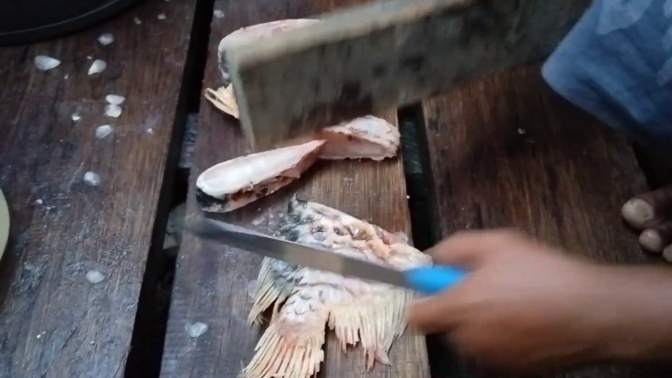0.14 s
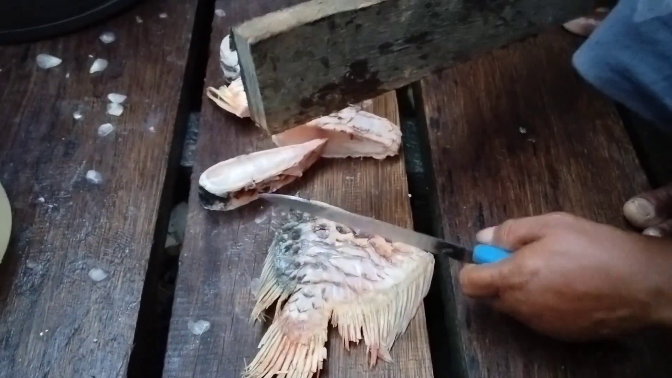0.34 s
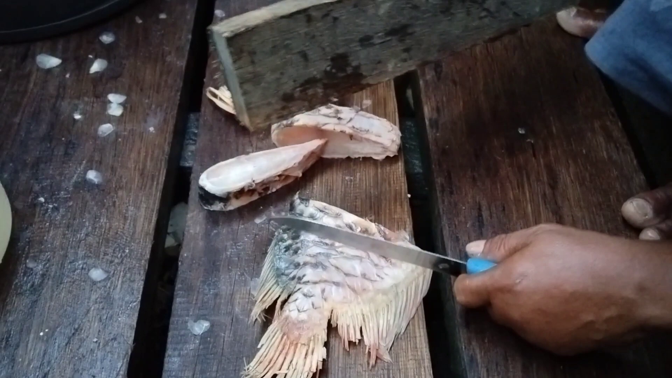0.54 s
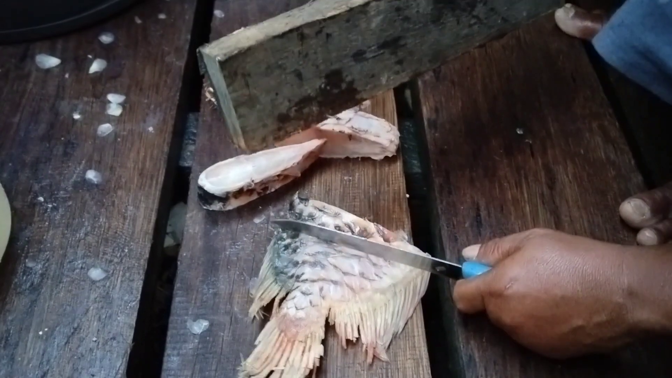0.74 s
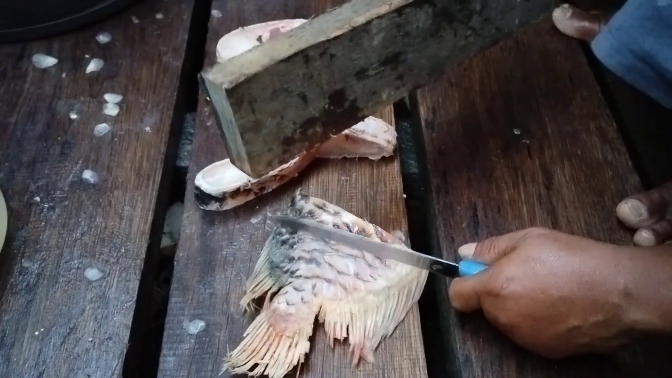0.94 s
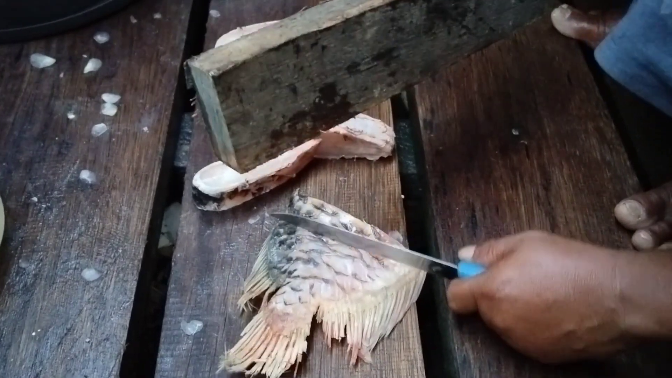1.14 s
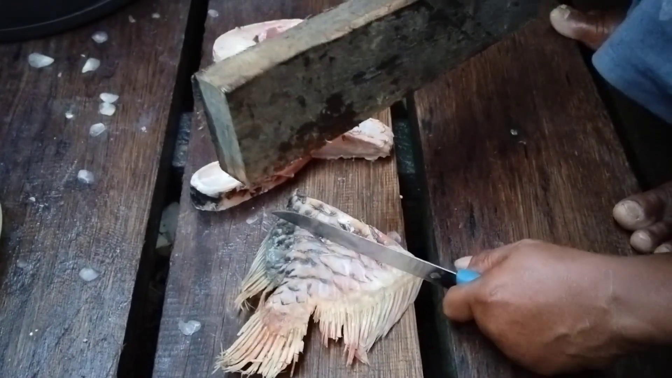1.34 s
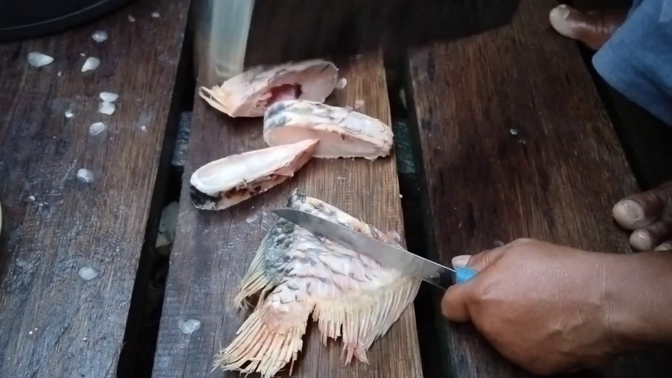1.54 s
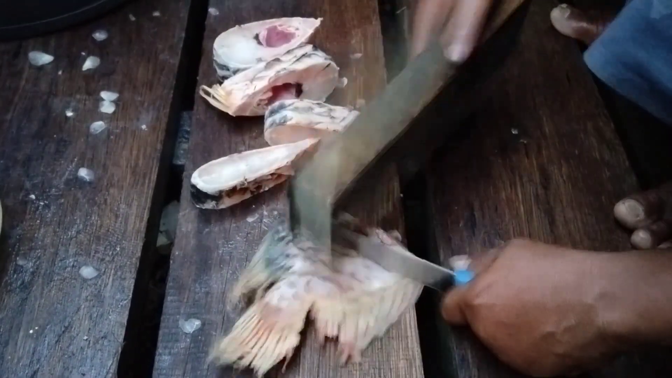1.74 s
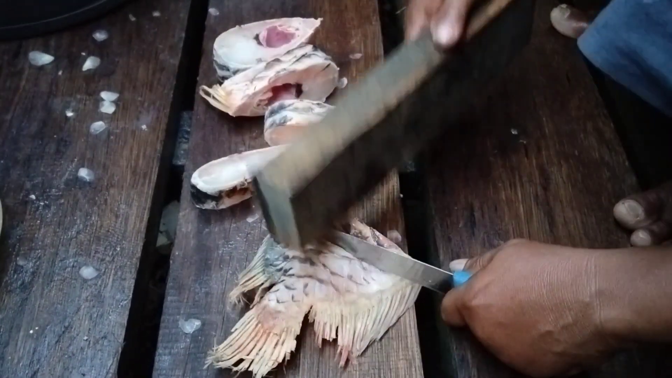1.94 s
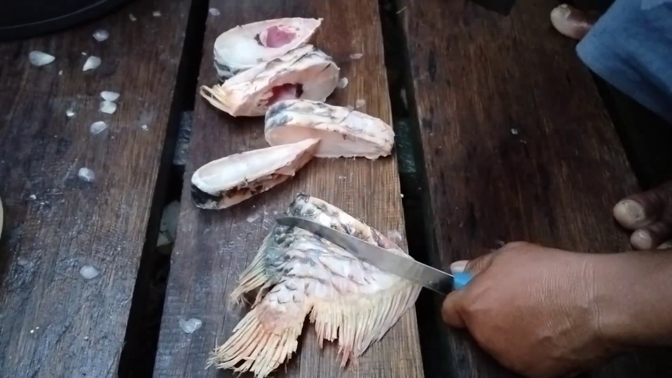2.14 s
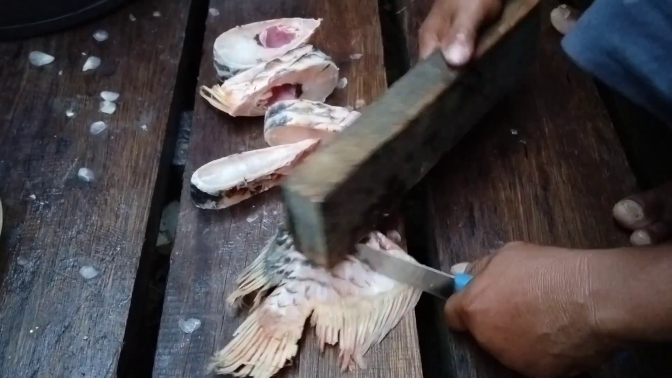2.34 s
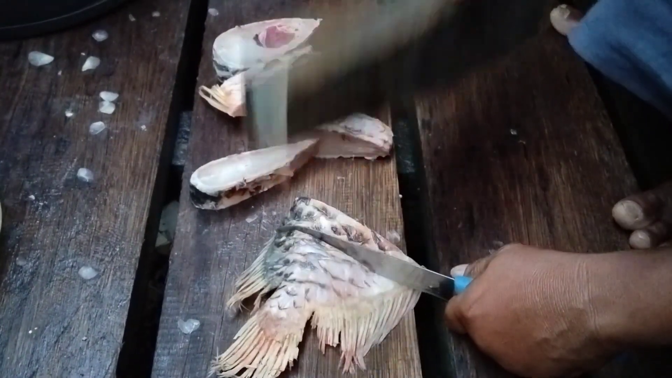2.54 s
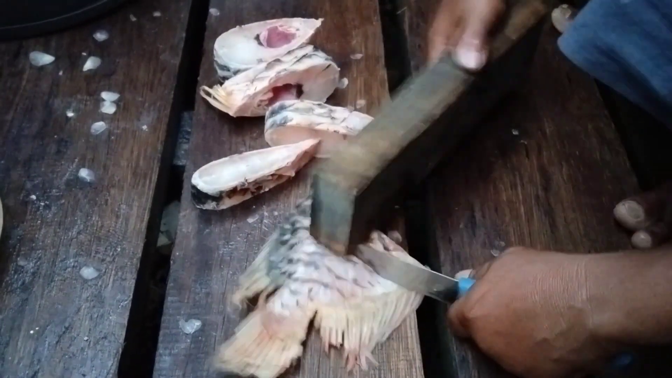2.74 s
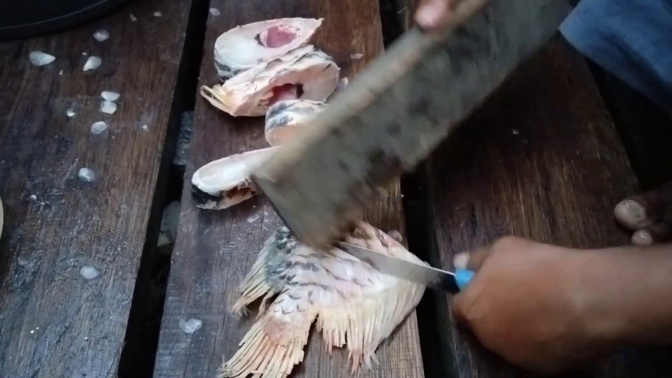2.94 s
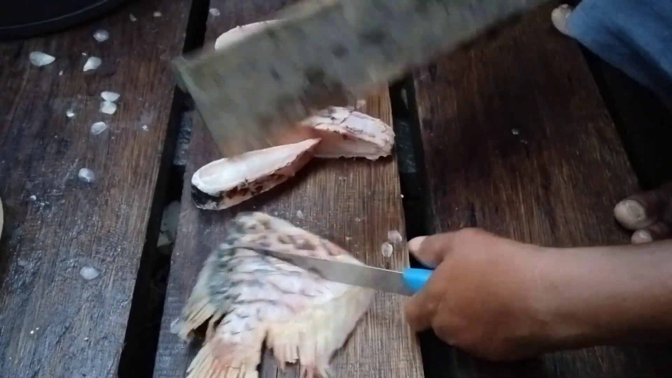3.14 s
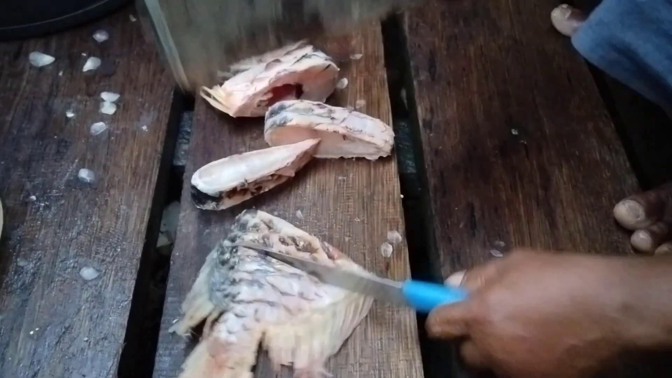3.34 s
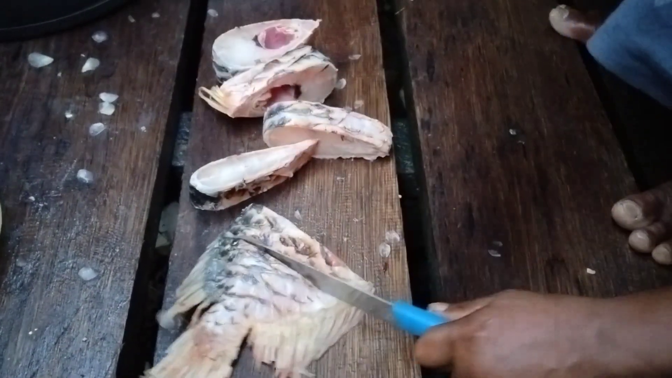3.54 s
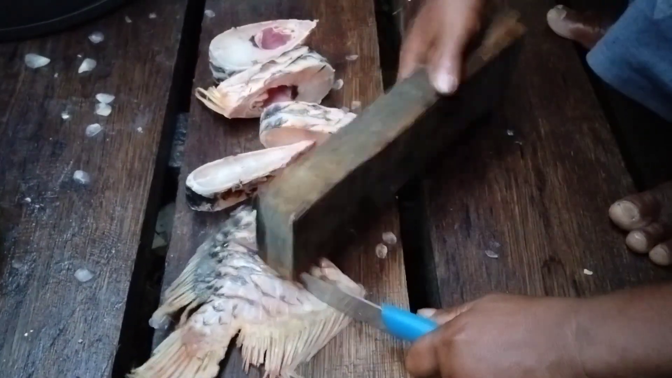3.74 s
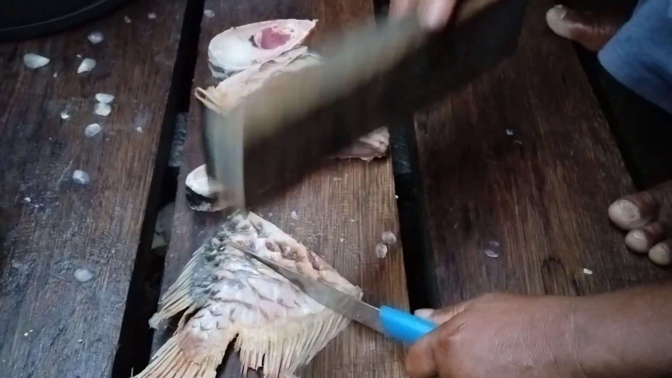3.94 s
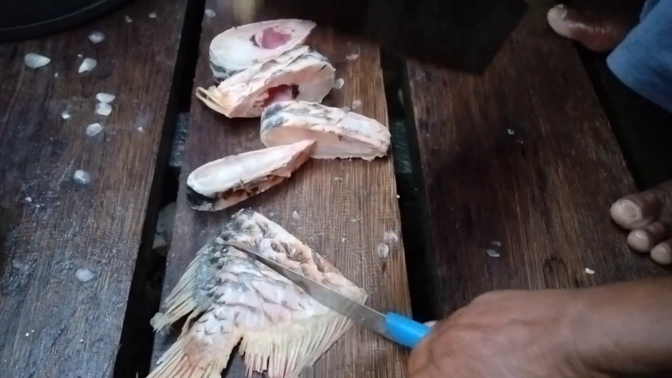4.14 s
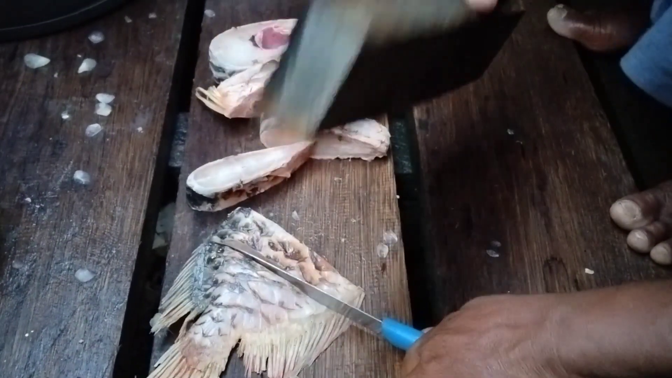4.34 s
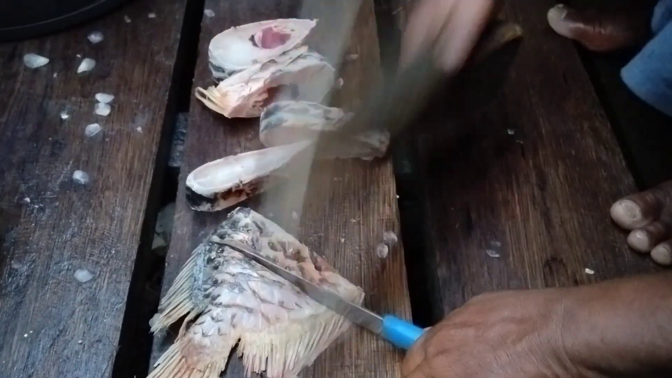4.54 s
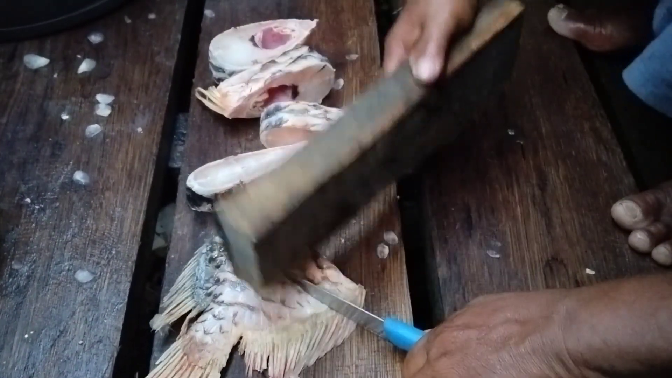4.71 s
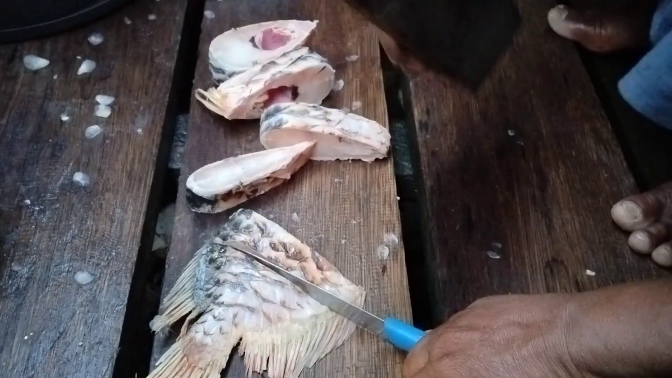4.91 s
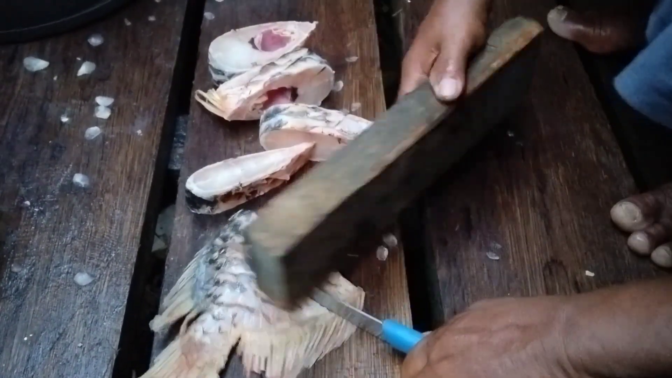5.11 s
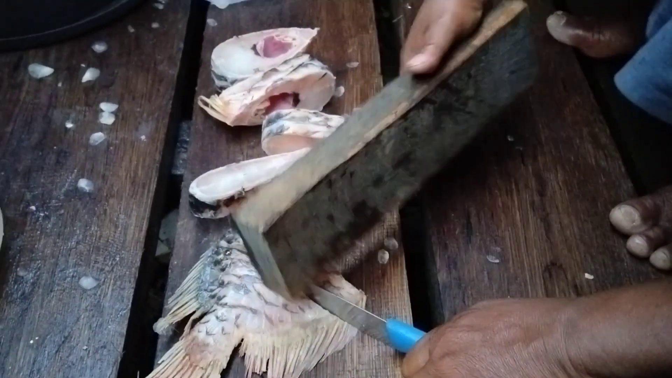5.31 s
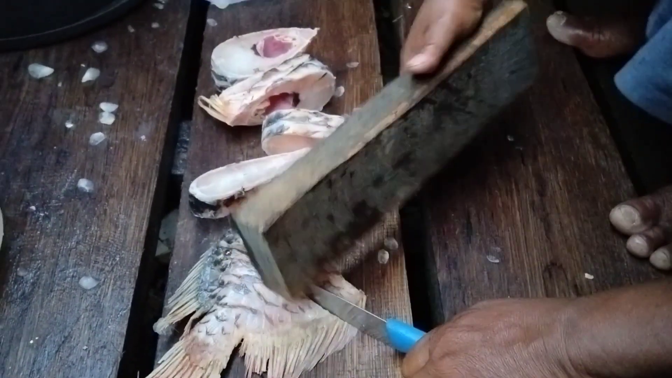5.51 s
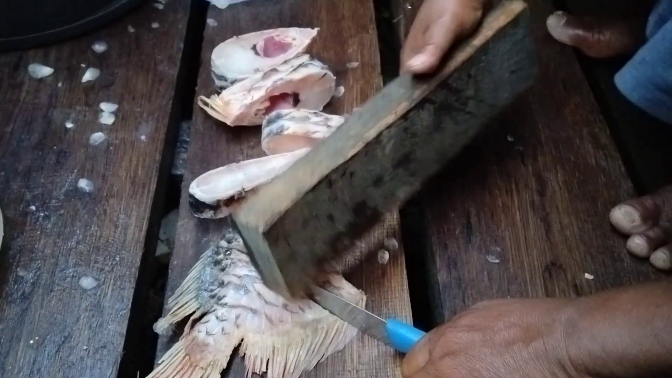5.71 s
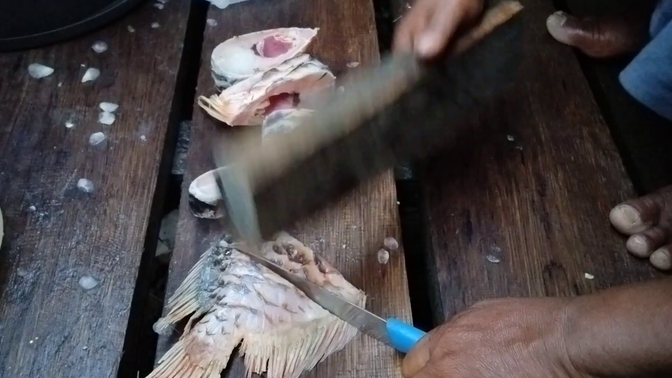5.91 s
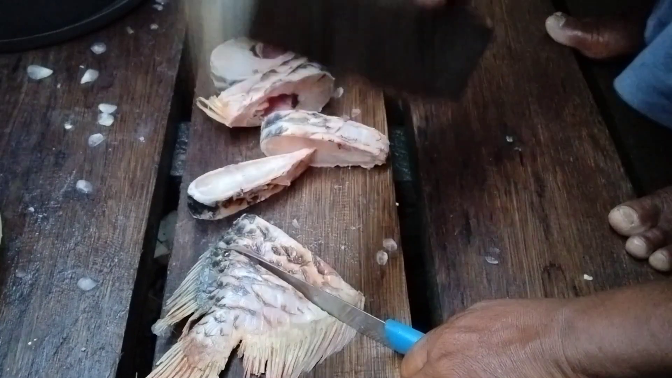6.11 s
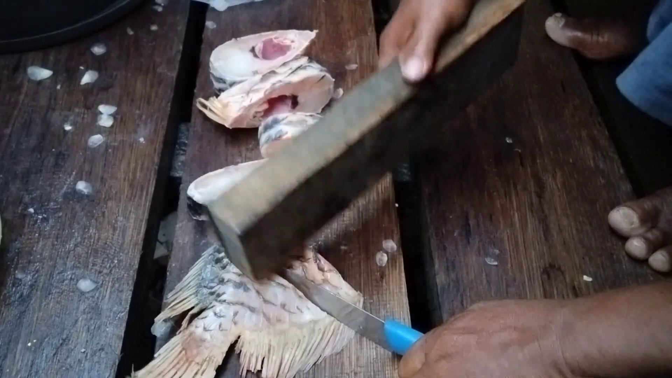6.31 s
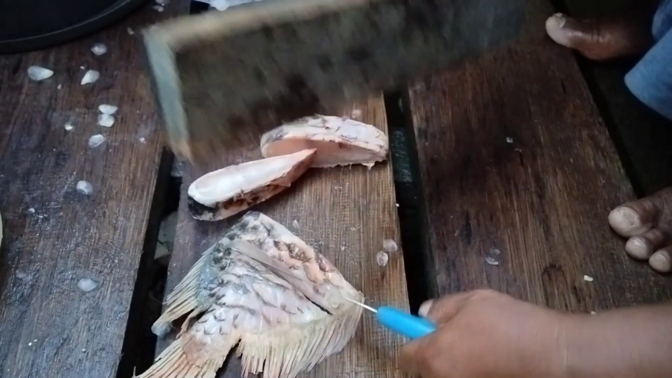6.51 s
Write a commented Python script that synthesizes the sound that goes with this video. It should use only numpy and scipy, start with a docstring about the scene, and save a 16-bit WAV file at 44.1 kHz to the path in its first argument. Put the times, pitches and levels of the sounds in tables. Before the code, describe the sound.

Chopping frozen fish on wooden planks, heard close on a phone. A soft background of motor hum, airy hiss, high insect and distant birds opens, with a few faint clacks. From 1.8 seconds come eight spaced hammer blows on a steel blade: the first four sharper and more piercing, the last four woodier and somewhat softer. Each has an instant attack, a fast-dying ring around two kilohertz and a short roomy tail, while the background ducks.

```python
"""Chopping frozen fish on a plank floor

Close to the microphone a wooden block hammers a knife spine: blade, planks and floor ring as decaying
modes, while the cracking fish and the room are bands of decaying noise; thuds and taps lie between.
Behind, a motor hums, a wavering sine amid noise bands; a high insect and a whistly, swelling hiss are
shaped noise, over quiet air; far birds peep in sines. After every blow all of this background but the
birds sinks, then partly returns."""
import sys
import numpy as np
from scipy import signal
from scipy.fft import rfft, irfft
from scipy.io import wavfile
from scipy.ndimage import uniform_filter1d

SR = 44100
rng = np.random.default_rng(int(sys.argv[2]) if len(sys.argv) > 2 else 0)


def wav_record(signal):
    """Record a signal, one row per channel, as 16-bit PCM in the file named by sys.argv[1]."""
    frames = np.transpose(np.atleast_2d(signal))
    bounded = np.clip(frames, -1, 1)
    # unit amplitude maps onto the largest positive 16-bit level
    quanta = np.round(bounded * 32767).astype(np.int16)
    wavfile.write(sys.argv[1], SR, quanta)


N = 293706

# Motor hum bands: (centre [Hz], width [Hz], level within the hum [dB])
HUM_BANDS = [(104, 4.4, -9), (125, 45, -3.5), (218.7, 3.9, -8.5), (339, 13, -14), (352, 76, -14)]
# Motor level before the sink: (time [s], level [dB])
MOTOR_LEVEL = [(0, -52.5), (.55, -52), (1.1, -55.5), (1.5, -49.5), (1.8, -48.5), (2.3, -49.5), (3.2, -56.5),
               (4.2, -56), (4.6, -54.5), (5.0, -49.5), (6.0, -60), (6.66, -57.5)]
# Hiss bands: (centre [Hz], width [Hz], resting level before the sink [dB])
HISS_BANDS = [(3020, 1000, -58), (4250, 1300, -63.5), (5420, 940, -60), (6780, 1300, -69)]
# Slow drift of the resting hiss: (time [s], change of level [dB])
HISS_DRIFT = [(0, -2), (1.3, -3), (1.8, 0.9), (3.3, 3.5), (4.3, 4.5), (5.3, 2.3), (5.9, -1.5), (6.66, -5)]
# Swells of the hiss: (middle [s], length [s], level before the sink [dB], centre [Hz])
HISS_SWELLS = [(0.174, .14, -54, 4360), (0.228, 0.22, -52.5, 3000), (0.244, 0.22, -52.5, 5460),
               (0.386, 0.31, -51.5, 4940), (0.405, 0.15, -52, 3000), (.64, 0.32, -50, 3170),
               (0.773, 0.32, -48.5, 3200), (0.896, 0.32, -51, 4840), (1.104, 0.19, -51.5, 3400),
               (1.438, 0.086, -52, 3600), (1.585, 0.24, -49.5, 3080), (1.818, 0.14, -48, 2940),
               (2.033, .1, -47.5, 2860), (2.248, 0.12, -56, 3260), (2.292, 0.31, -53, 5050),
               (2.65, 0.17, -53.5, 3100), (2.744, 0.33, -55, 5450), (3.06, .14, -49.5, 3023),
               (3.087, 0.28, -49, 5320), (3.249, .2, -55, 5640), (3.562, 0.11, -50.5, 3018),
               (3.638, 0.19, -53, 5330), (4.429, 0.19, -49, 3105), (4.942, 0.083, -52, 3200),
               (5.358, .12, -49.5, 3310), (5.902, .1, -55.5, 3010), (6.578, .2, -53, 3100)]
# Spectrum of the quiet air: (frequency [Hz], relative density [dB per Hz])
AIR_SPECTRUM = [(15, -33), (25, -10.5), (60, -4.5), (117, -1), (200, -8.5), (272, -17.5), (400, -22.5),
                (600, -26.5), (1440, -29.5), (2950, -20), (5000, -30), (7700, -33.5), (8300, -31),
                (8800, -33), (10200, -34.5), (10800, -70.5), (22000, -110)]
# Progress of the insect: (time [s], chirps begun so far [count])
CHIRP_COUNT = [(-.021, -1), (1.723, 12), (2.103, 15), (3.623, 27), (4.683, 35), (6.71, 51)]
# Bird peeps: (time [s], level [dB], pitch [Hz], length [s])
BIRD_PEEPS = [(0.197, -45.5, 2560, 0.027), (0.338, -53.5, 5380, 0.17), (0.595, -41.5, 2930, 0.02),
              (.68, -44.5, 3570, 0.04), (.74, -42.5, 3090, 0.1), (1.03, -48, 3825, 0.029),
              (1.086, -41.5, 2380, 0.013), (1.144, -48.5, 2655, 0.032), (1.544, -52, 3120, 0.069),
              (1.579, -41, 2670, 0.033), (1.572, -60.5, 1620, 0.055), (1.55, -65, 1335, 0.11),
              (1.712, -58.5, 1655, 0.062), (2.022, -57, 2657, 0.05), (2.12, -57, 3450, 0.033),
              (3.52, -62.5, 2630, 0.064), (4.384, -67.5, 3340, 0.077), (4.447, -67.5, 2700, 0.089),
              (5.338, -70.5, 3560, 0.054)]
# Small taps: (time [s], level [dB], centre [Hz])
SMALL_TAPS = [(.635, -47, 775), (.938, -48.5, 1006), (0.961, -50.5, 1210), (1.089, -50.5, 1255),
              (1.211, -46, 422), (3.131, -58.5, 6900), (3.2, -54, 553), (4.303, -42, 1576)]
# Hammer blows: (time [s], blade [dB], beating mode [dB], overtones [dB], full ring [s], drop after it [dB],
# plank [dB], boom [dB], crack [dB], crack brightness [dB per octave], background sink [dB])
HAMMER_BLOWS = [(1.8216, 1.5, -8.5, -7.5, .0079, -9.5, -27.5, -19.5, -20.5, -3.5, 15),
                (2.3537, 0.5, -20.5, -6, 0.0074, -16, -25.5, -27.5, -19, -1, 10.5),
                (2.802, 1, -21.5, 0, .0068, -13, -25.5, -25.5, -23.5, 0, 9),
                (3.8065, 1, -26, 6, 0.01, -13.5, -26, -33, -25, 1.5, 10),
                (4.6429, -9.5, -13.5, -3, 0.0094, -9, -17.5, -24.5, -24, -3.5, 3),
                (5.076, -7, -14.5, -5.5, .0092, -13.5, -14.5, -24.5, -25, -1, 3),
                (5.5375, -7, -12, -0.5, 0.0094, -12.5, -16, -31, -25, 0.5, 4.5),
                (6.2445, -10.5, -15, -1, 0.013, -7.5, -23, -33.5, -28.5, 0.7, 1.5)]
# Overtones of the struck blade: (frequency [Hz], level [dB], t60 [s])
BLADE_MODES = [(1544, -23.5, 0.13), (3014, -12, 0.039), (3490, -22.5, .05), (5400, -20, 0.044),
               (6580, -29, 0.052), (7100, -16.5, 0.0076), (7350, -23.5, 0.0073), (8940, -30, 0.01)]
# Modes of the struck plank: (frequency [Hz], level [dB], t60 [s])
PLANK_MODES = [(380, -5, .035), (445, -4, .035), (510, -3, .035), (640, -2, .035), (760, -2, .03),
               (865, -3, .03), (960, -4, .025), (1060, -5, .025), (1248, -3, .04), (1545, -6, .06),
               (1835, -5, .03), (2600, -7, .03), (3200, -8, .03)]
# Modes of the booming floor: (frequency [Hz], level [dB], t60 [s])
FLOOR_MODES = [(103, -9, 0.041), (122, -3.5, 0.18), (196, -4, 0.19), (237, 0, 0.13), (294, -6, 0.09)]
# Noise after a blow: (centre [Hz], crack [dB], crack t60 [s], room [dB], room t60 [s])
CRACK_AND_ROOM = [(66, -42, 0.16, -10, 0.37), (133, -23, .1, -7, 0.77), (228.1, -10, 0.24, -6, 0.52),
                  (444.4, 2, 0.025, -3.5, 0.43), (900, -8, 0.11, -4, 0.46), (1628, -7, 0.066, -9.5, 0.45),
                  (2390, 3, 0.075, 4, 0.33), (2860, 2, 0.072, -16, 0.88), (4540, -0.5, 0.054, -14, 0.44),
                  (6600, -4.5, 0.044, -18.5, 0.3), (8700, -16, .03, -20.5, 0.11),
                  (13500, -21, 0.009, -43.5, .05)]
# The fish drops back on the planks: (time [s], level [dB])
FISH_THUDS = [(1.875, -16.5), (2.396, -19.5), (2.854, -38), (4.692, -36), (5.124, -32), (5.59, -34.5),
              (6.297, -41)]

AIR_DB = -51  # before the sink
SWELL_FALL_DB = 39.5  # one octave from the centre, growing with the square of the distance
INSECT_HZ, INSECT_DB, STROKE_HZ = 9510, -64, 131  # level before the sink
MISSED_CHIRP = 14  # this one stays faint
TAP_T60_S, TAP_RING_DB = 0.074, -1
RING_HZ, BEAT_HZ = 2275, 2033  # the blade's strongest mode and its neighbour
RING_T60_S, DROPPED_T60_S = 0.1, 0.2  # after the drop, the second decay multiplies the first
LINGER_DB = -34.5  # ring lingering in the room, against the blade level
THOCK_HZ, THOCK_DB = 797, 5  # the block's short knock, against the plank level
TICK_DB, TICK_T60_S = 8, 0.0066  # the first instant of the crack is sharper
ROOM_DB = -20.5  # against the crack level
# The room gains BRIGHTENS dB per octave for each dB that the blade tops the plank by more than EVEN_DB.
EVEN_DB, BRIGHTENS = 15, 0.39
THUD_HZ, THUD_T60_S = 206.2, 0.1
SINK_KEPT, SINK_BACK_S = 0.43, 0.36  # share of each sink that stays, time constant of the return
TOP_HZ = 16000


def undb(db):
    """Turns decibels into an amplitude factor."""
    return 10 ** (np.asarray(db) / 20)


def level(x, db=0):
    """Sets the RMS level."""
    return x * undb(db) / np.sqrt(np.mean(x ** 2))


def add(track, s, sound):
    """Mixes a sound in at a time."""
    i = int(s * SR)
    track[i:i + len(sound)] += sound[:N - i]


def sine(hz, t):
    """Steady sine."""
    return np.sin(2 * np.pi * hz * t)


def band(x, hz, width_hz):
    """Bell-shaped band-pass."""
    f = np.arange(len(x) // 2 + 1) * SR / len(x)
    return irfft(rfft(x) * np.exp(-2 * ((f - hz) / width_hz) ** 2), len(x))


def noise_band(length, hz, width_hz, db=0):
    """Fresh random noise in one band, at a set RMS level."""
    return level(band(rng.standard_normal(length), hz, width_hz), db)


def fade(t, t60):
    """Exponential decay, 60 dB down after t60 seconds."""
    return 1000. ** (-t / t60)


def onset(t, rise_s):
    """Smooth attack that reaches one half after rise_s."""
    return t ** 2 / (t ** 2 + rise_s ** 2)


def walk(rate):
    """Random levels held 1 / rate s and slewed twice."""
    k = int(SR / rate)
    steps = np.repeat(rng.standard_normal(N // k + 1), k)
    return uniform_filter1d(uniform_filter1d(steps, k), k)[:N]


def follow(t, table):
    """Straight lines through the (time, value) points of a table."""
    return np.interp(t, *np.transpose(table))


def motor(t):
    """Motor hum: narrow noise bands around a sine drone whose pitch and level waver."""
    hum = level(sum(noise_band(N, hz, width_hz, db) for hz, width_hz, db in HUM_BANDS))
    drone_hz = 99.5 + 2.8 * walk(1.4)
    drone = np.sin(2 * np.pi * np.cumsum(drone_hz) / SR)
    hum += undb(5.0 + 3.0 * walk(5.8)) * drone
    return undb(follow(t, MOTOR_LEVEL)) * hum


def hiss_grain(hz, width_hz):
    """Grainy noise with brief narrow whistles in it."""
    out = noise_band(N, hz, width_hz) * undb(3.0 * walk(30))
    for offset in np.linspace(-.45, .45, num=9):
        whistle = noise_band(N, hz + offset * width_hz, 40, -11.5)
        out += whistle * undb(5.5 * walk(24))
    return level(out)


def hiss_gain(t, hz, rest_db):
    """Adds the powers of one band's resting level and every swell, weaker the further its centre lies."""
    power = undb(rest_db + follow(t, HISS_DRIFT)) ** 2
    for middle_s, length_s, db, centre_hz in HISS_SWELLS:
        shape = np.cos(np.pi * np.clip((t - middle_s) / length_s, -.5, .5)) ** 2
        octaves = np.log2(hz / centre_hz)
        power = power + shape * undb(db - SWELL_FALL_DB * octaves ** 2) ** 2
    return np.sqrt(power)


def hiss(t):
    """Whistly hiss: grainy noise bands that swell and fade."""
    return sum(hiss_gain(t, hz, db) * hiss_grain(hz, width_hz) for hz, width_hz, db in HISS_BANDS)


def air():
    """Broad quiet noise with a drawn spectrum."""
    f = np.maximum(np.arange(N // 2 + 1) * SR / N, 1)
    hz, db = np.transpose(AIR_SPECTRUM)
    gain = undb(np.interp(np.log(f), np.log(hz), db))
    return level(irfft(rfft(rng.standard_normal(N)) * gain, N), AIR_DB)


def insect(t):
    """Wing strokes pulse a high noise band, in chirps that grow, sink in pitch and stop short."""
    number, phase = np.divmod(follow(t, CHIRP_COUNT), 1)
    sounding = (phase < .7) & (number != MISSED_CHIRP)
    chirp = uniform_filter1d(np.where(sounding, .5 + phase, .1), size=400)
    strokes = 1 + .45 * np.sin(2 * np.pi * STROKE_HZ * t + 2.0 * walk(8))
    high = noise_band(N, INSECT_HZ * 1.013, 300)
    low = noise_band(N, INSECT_HZ * .992, 300)
    glide = uniform_filter1d(phase, size=300)  # crossfade from high to low
    return level(chirp * strokes * (high * (1 - glide) + low * glide), INSECT_DB)


def birds():
    """Far birds: short soft sine whistles under a half-sine swell."""
    out = np.zeros(N)
    for s, db, hz, length_s in BIRD_PEEPS:
        u = np.linspace(0, 1, int(length_s * SR))
        add(out, s, undb(db) * np.sin(np.pi * u) * sine(hz * length_s, u))
    return out


def taps():
    """Small clacks: a sine and a lower, broad noise band share one decay."""
    out, t = np.zeros(N), np.arange(8000) / SR
    for s, db, hz in SMALL_TAPS:
        clack = undb(TAP_RING_DB) * sine(hz, t) + noise_band(len(t), 0.75 * hz, 1.08 * hz)
        add(out, s, undb(db) * clack * fade(t, TAP_T60_S) * (1 - fade(t, 0.036)))
    return out


def struck_modes(modes, t, spread_db, rise_s):
    """Struck modes with random strengths and phases, under a soft attack."""
    hz, db, t60 = np.transpose(modes)[:, :, None]
    strength, phase = rng.standard_normal((len(modes), 2)).T[:, :, None]
    waves = undb(db + spread_db * strength) * fade(t, t60) * np.sin(2 * np.pi * (hz * t + phase))
    return waves.sum(axis=0) * onset(t, rise_s)


def blade(t, rise, beat_db, over_db, full_s, drop_db):
    """Two neighbouring modes beat under overtones, then drop abruptly to a weaker ring; a rough ring lingers."""
    ringing = (sine(RING_HZ, t) + undb(beat_db) * sine(BEAT_HZ, t)) * rise * fade(t, RING_T60_S)
    ringing *= fade(np.maximum(t - full_s, 0), DROPPED_T60_S)
    ringing += undb(over_db) * struck_modes(BLADE_MODES, t, spread_db=2.0, rise_s=0.0011)
    drop = 1 / (1 + np.exp(np.clip((full_s - t) / 0.0005, -50, 50)))  # smooth step from 0 to 1
    # the walls return the ring roughened
    linger = noise_band(len(t), RING_HZ, 190, LINGER_DB) * fade(t, .26) * rise
    return ringing * undb(drop_db * drop) + linger


def plank(t, rise):
    """Plank modes and a noisy knock, less the block's short sine knock."""
    modes = struck_modes(PLANK_MODES, t, spread_db=2.0, rise_s=.0015)
    knock = noise_band(len(t), 670, 900, 4.0) * fade(t, 0.066) * rise
    thock = undb(THOCK_DB) * sine(THOCK_HZ, t) * fade(t, 0.026) * onset(t, 0.00055)
    return modes + knock - thock


def floor_boom(t):
    """Low floor modes build up quickly and die away."""
    modes = sum(undb(db) * fade(t, t60) * sine(hz, t) for hz, db, t60 in FLOOR_MODES)
    return modes * (1 - fade(t, 0.0067))


def crack_and_room(t, rise, crack_db, bright_db, room_tilt_db):
    """Frozen flesh and bone give way in uneven splinters of noise; the room answers band by band."""
    out = np.zeros(len(t))
    splinters = undb(6.1 * walk(510)[:len(t)])
    for hz, snap_db, snap_t60, wall_db, wall_t60 in CRACK_AND_ROOM:
        noise = noise_band(len(t), hz, 0.61 * hz)
        octaves = np.log2(max(hz / RING_HZ, 1))  # tilts act only above the blade's ring
        snap_fade = fade(t, snap_t60) + undb(TICK_DB) * fade(t, TICK_T60_S)
        snap = undb(crack_db + snap_db + bright_db * octaves) * splinters * snap_fade * rise
        room_gain = undb(crack_db + ROOM_DB + wall_db + room_tilt_db * octaves)
        room = room_gain * fade(t, wall_t60) * (1 - fade(t, 0.011))
        out += noise * (snap + room)
    return out


def blows():
    """Each blow sounds the blade, plank, floor, crack and room together."""
    out, t = np.zeros(N), np.arange(24000) / SR
    rise = onset(t, 0.00087)
    for (s, blade_db, beat_db, over_db, full_s, drop_db,
         plank_db, boom_db, crack_db, bright_db, _) in HAMMER_BLOWS:
        room_tilt_db = BRIGHTENS * (blade_db - plank_db - EVEN_DB)
        hit = undb(blade_db) * blade(t, rise, beat_db, over_db, full_s, drop_db)
        hit += undb(plank_db) * plank(t, rise)
        hit += undb(boom_db) * floor_boom(t)
        hit += crack_and_room(t, rise, crack_db, bright_db, room_tilt_db)
        add(out, s, hit)
    return out


def thuds():
    """The fish drops back on the planks: one low decaying sine each time."""
    out, t = np.zeros(N), np.arange(8000) / SR
    thud = fade(t, THUD_T60_S) * (1 - fade(t, 0.0049)) * sine(THUD_HZ, t)
    for s, db in FISH_THUDS:
        add(out, s, undb(db) * thud)
    return out


def background_sink(t):
    """Every blow steps the background down [dB]; each step is then partly won back."""
    sink_db = np.zeros(N)
    for s, *_, step_db in HAMMER_BLOWS:
        remaining = SINK_KEPT + (1 - SINK_KEPT) * np.exp(-np.abs(t - s) / SINK_BACK_S)
        sink_db += (t > s) * step_db * remaining
    return sink_db


def scene():
    """Sinking background, with the birds and the close chopping at their own levels."""
    t = np.arange(N) / SR
    background = motor(t) + hiss(t) + air() + insect(t)
    chopping = taps() + blows() + thuds()
    return (undb(-background_sink(t)) * background + birds() + chopping)[None]


def record(dry):
    """The phone's microphone drops the deep bass, rounds the loudest peaks and cuts the top."""
    thin = signal.sosfilt(signal.butter(2, 60, "high", fs=SR, output="sos"), dry)
    rounded = np.tanh(0.77 * thin) / 0.83
    return signal.sosfilt(signal.ellip(8, .2, 70, TOP_HZ, fs=SR, output="sos"), rounded)


dry = scene()
out = record(dry)
wav_record(out)
```